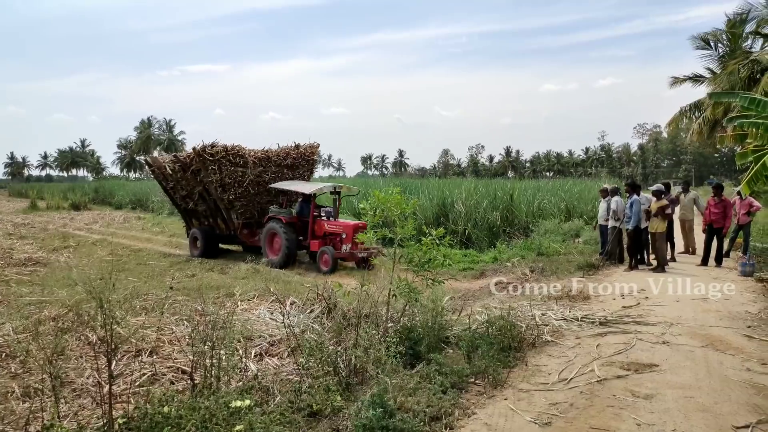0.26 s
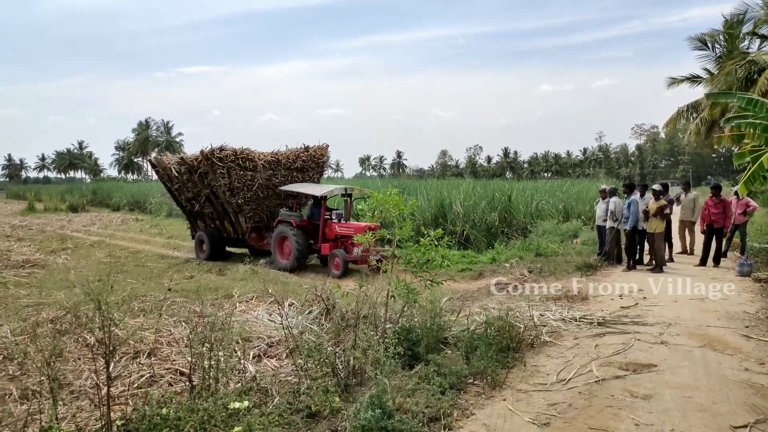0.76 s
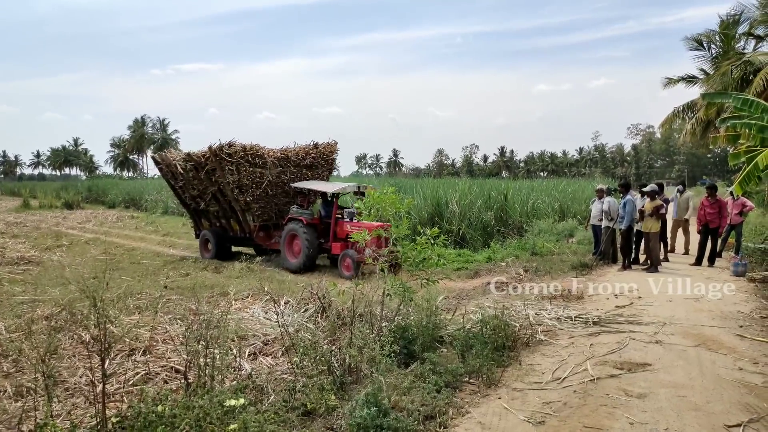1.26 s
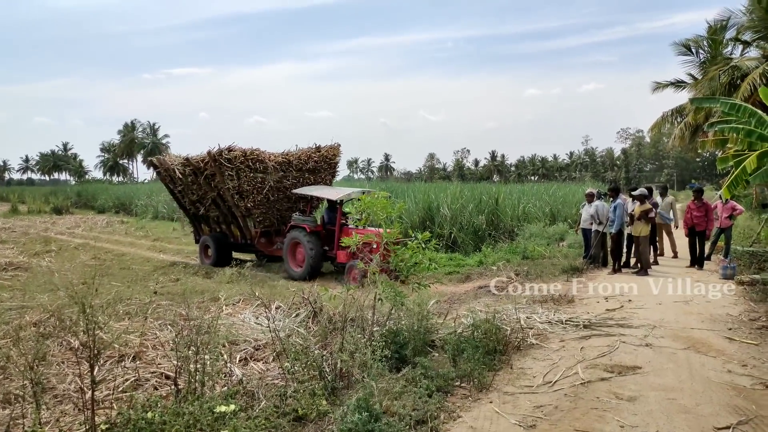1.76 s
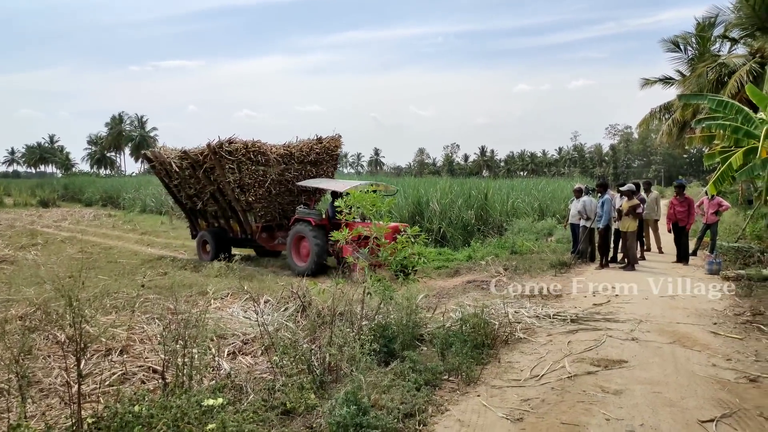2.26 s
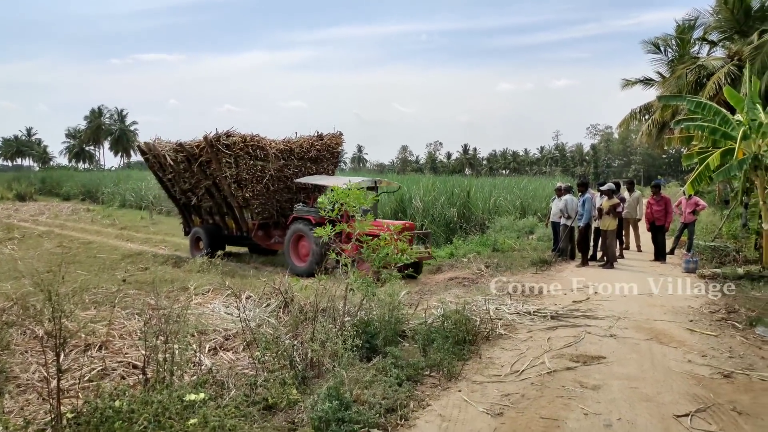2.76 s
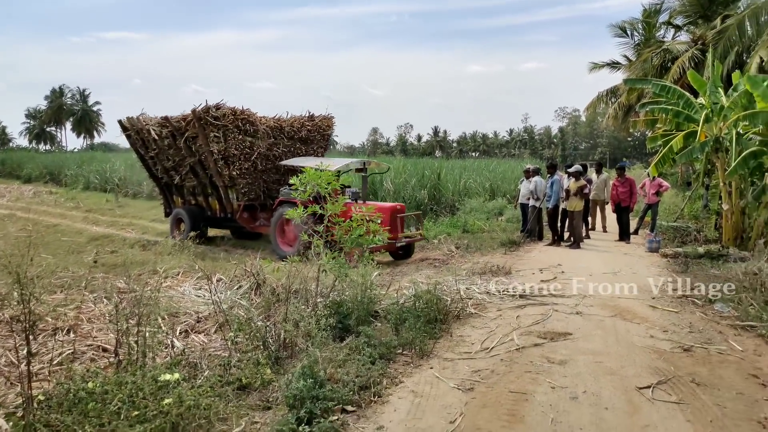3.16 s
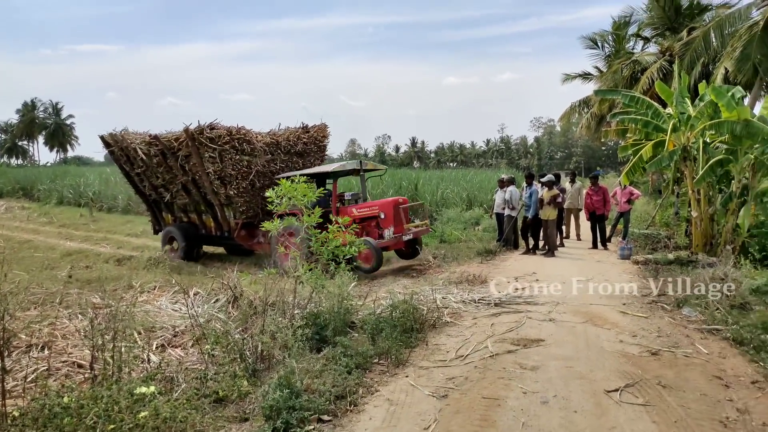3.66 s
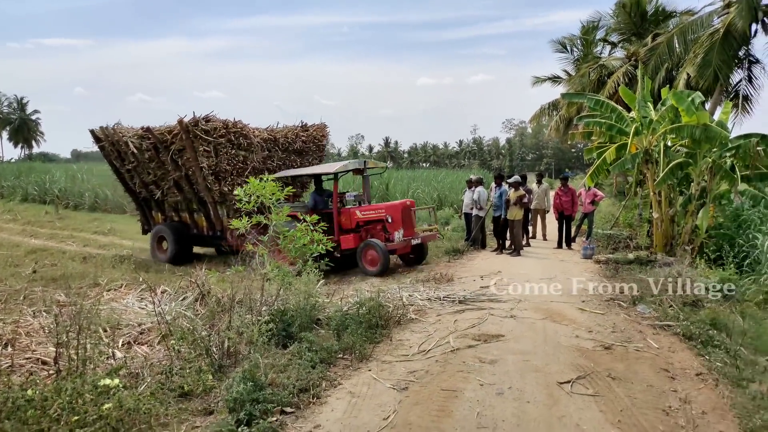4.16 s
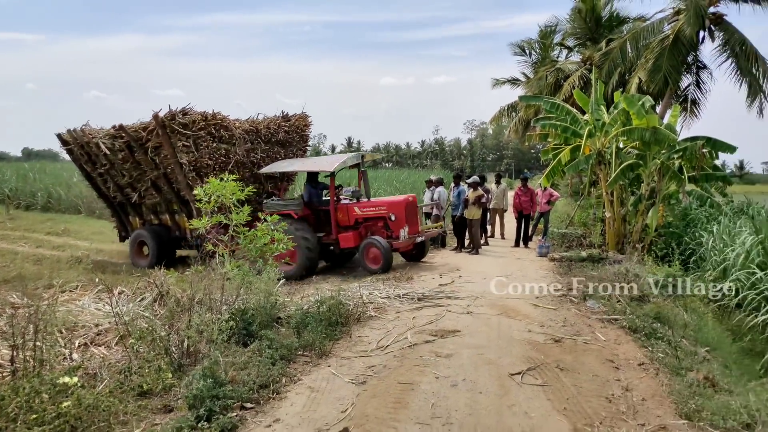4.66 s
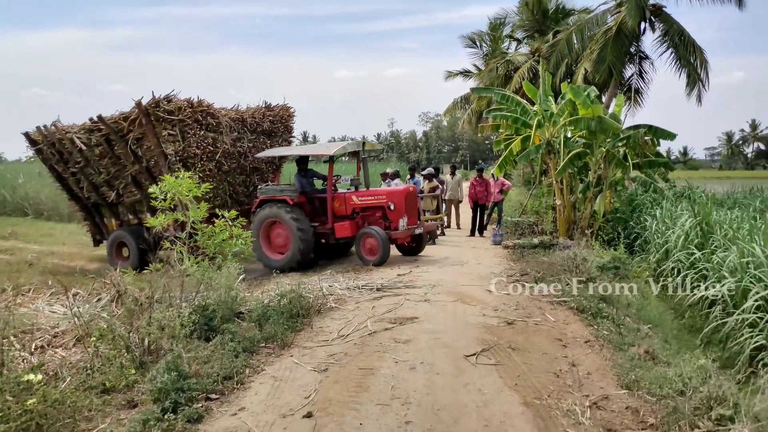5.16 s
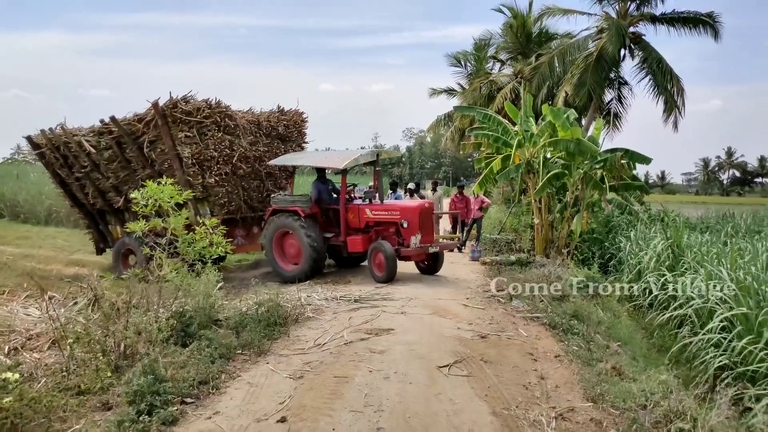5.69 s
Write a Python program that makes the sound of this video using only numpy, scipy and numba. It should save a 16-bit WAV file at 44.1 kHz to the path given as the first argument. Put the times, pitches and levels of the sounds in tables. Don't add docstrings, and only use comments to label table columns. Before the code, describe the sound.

A diesel tractor idles unevenly in an open field, then revs hard and hauls a heavy rattling trailer steadily closer.

```python
import sys
import numpy as np
from scipy import signal
from scipy.fft import rfft, irfft
from scipy.io import wavfile
from scipy.ndimage import uniform_filter1d
from numba import njit

SR = 44100
rng = np.random.default_rng(int(sys.argv[2]) if len(sys.argv) > 2 else 0)


def generate_wav(sig):
    pcm = np.round(np.clip(np.atleast_2d(sig).T, -1, 1) * 32767).astype(np.int16)
    wavfile.write(sys.argv[1], SR, pcm)


def ratio_of_db(decibels):
    return 10 ** (np.asarray(decibels, float) / 20)


N = 261513

# [f/Hz, level/dB]
PIPE_RESPONSE = [(120, -5), (155, -6), (175, -9), (207, -12), (270, -23), (335, -28), (415, -29),
                 (480, -20), (545, -25), (700, -31), (900, -39)]
# [f/Hz, width/Hz, level/dB]
BLOCK_MODES = [(650, 90, 5), (1000, 130, -5), (1450, 260, -8), (2100, 160, -6), (3100, 300, -11)]
CYLINDER_LEVELS = [0, -.6, .3, -.5]
# [f/Hz, level/dB per Hz]
ROAR_SPECTRUM = [(45, -18.5), (100, 4.5), (200, -2), (340, -3), (520, 1), (700, -2), (850, -2), (1100, -5),
                 (1500, -8), (2000, -9.5), (2600, -6.5), (4500, -8), (8000, -5.5)]
# [f/Hz, level/dB]
LEFT_PORT_RESPONSE = [(30, 3), (200, 1.5), (500, 0.5), (900, -6.5), (1400, -19.5), (1900, -23), (2600, -16),
                      (4300, -12), (5500, -6), (6100, 2.5), (6550, 3), (7300, -1), (7750, -12.5),
                      (7950, -54)]
# [f/Hz, level/dB]
RIGHT_PORT_RESPONSE = [(30, 0.5), (200, 0), (500, 1.5), (4500, 1), (5500, 5), (6600, 7.5), (7050, 10),
                       (7420, 15.5), (7750, 6), (7980, -9.5), (8330, -57.5)]
# [f/Hz, share/0-1]
PORT_CORRELATION = [(100, 0.95), (500, 0.98), (1000, 1), (1900, 0), (4000, 0.4), (5500, 0.8), (7500, .45)]
# [t/s, peak level/dB, ring f/Hz, t60/s]
LOOSE_KNOCKS = [(1.218, -46, 5250, .05), (1.264, -43, 5250, .06), (1.268, -46, 5950, .05),
                (1.31, -41, 5900, .07), (1.355, -46, 5800, .05), (2.571, -25, 650, .05),
                (2.5715, -25, 7300, .02), (3.7435, -20, 7400, .015), (1.93, -42, 5900, .07),
                (1.97, -41, 6000, .07), (2.02, -41, 5900, .06), (4.4705, -16, 400, .045),
                (4.4725, -30, 1850, .02), (4.825, -29, 560, .07), (5.0888, -15, 6800, .011),
                (4.6, -31, 430, .1), (4.74, -33, 390, .08), (4.91, -33, 380, .08), (5.09, -30, 420, .1),
                (5.152, -27, 6000, .04), (5.27, -25, 6100, .08), (5.31, -23, 6000, .08),
                (5.35, -24, 6200, .07)]
# [order/1, level/dB re pipe response]
HALF_ORDER_LEVELS = [(1.5, -27), (2.5, -14), (3.5, -13), (4.5, -15), (5.5, -14), (6.5, -12), (7.5, -3),
                     (8.5, -10)]
# [f/Hz, half width/Hz, level/dB]
PANEL_MODES = [(926, 130, -1), (1260, 250, 3.5), (1550, 29, 10), (2003, 180, 7.5), (2314, 92, -4),
               (2477, 15, 6), (2980, 32, 3), (3430, 60, 0), (3800, 42, 1.5), (4530, 60, 3), (5700, 65, -5)]
# [f/Hz, level/dB]
LOAD_GAIN = [(120, -4.5), (220, 6.5), (380, 4), (550, 9.5), (750, 1.5), (1050, 0.5), (1600, 0.5)]
# [t/s, firing f/Hz]
FIRING_RATE = [(0, 42.7), (.42, 44.7), (.8, 42.2), (1.2, 44.1), (1.88, 41.8), (2.03, 43.2), (2.26, 49.2),
               (3.04, 58.8), (3.35, 65.4), (3.68, 65.4), (3.83, 68.1), (4.03, 67.2), (4.33, 69.3),
               (4.62, 69.1), (4.73, 70.8), (5.02, 69.8), (5.17, 67.5), (5.93, 68.8)]
# [t/s, distance/m]
APPROACH = [(0, 20.7), (2.0, 18.8), (3.3, 18.9), (4.2, 16), (5.2, 13.6), (5.93, 10.1)]
# [peak t/s, rise/s, fall/s, level/dB]
FUEL_SURGES = [(.11, 0.17, 0.21, 7), (.41, 0.17, 0.05, 16.5), (.5, .04, 0.069, 2), (.59, 0.058, 0.059, 2),
               (.73, 0.15, 0.03, 12), (.89, 0.18, .05, 6), (1.03, 0.15, 0.052, 10.5), (1.23, .1, 0.14, 7.5),
               (1.36, 0.1, 0.064, 9), (1.6, 0.17, 0.17, 5.5), (1.95, 0.21, 0.24, 13)]
# [deepest t/s, fall/s, recovery/s, level/dB]
FUEL_CUTS = [(2.36, 0.081, .08, -2.5), (2.9, 0.097, 0.19, -3), (3.75, .3, 0.21, -0.5),
             (3.91, 0.11, 0.085, -6), (4.385, 0.14, 0.084, -6), (4.46, .15, 0.14, -8.5),
             (4.6, 0.13, 0.12, -1), (4.69, 0.084, 0.11, -11), (4.78, 0.058, 0.18, -8),
             (4.95, 0.088, 0.15, -11.5), (5.08, 0.075, .11, -8.5), (5.66, 0.097, 0.082, -2.5)]
# [leanest t/s, fall/s, recovery/s, level/dB]
FUEL_BUILD_UP = [
    (2.08, 0.038, 0.67, -1.5),
]
# [t/s, level/dB]
MISFIRES = [
    (.3, -15),
    (.46, 1),
    (.56, -3),
    (.84, -5),
    (1.14, -5),
    (4.385, -13.5),
    (4.77, -3),
    (4.96, -5.5),
]
# [f/Hz, level/dB]
TAILPIPE_RESPONSE = [(44, 1.3), (50, -3), (59, 0.5), (65, 1), (69, -1)]

# [idle level/dB, surge gain/1, open-throttle rise/dB, cut gain/1, slope/(dB per Hz)]
BODY_LAYER = (-45, 0.21, 7, 0.22, -0.04)
CLATTER_LAYER = (-51, 0.2, 7.5, 0.41, 0.2158)
HISS_LAYER = (-51.5, 0.89, 20, 0.79, 0.12)
PUFF_LAYER = (2.5, 0.83, 16, 1.6, -.5)
RASP_LAYER = (1.5, 0.41, -2.5, -.5, 0.1877)
KNOCK_LAYER = (-23, -0.36, 12.5, 0.2, -0.8555)
FIRST_ORDER_LAYER = (-44.5, 1.0, 21.5, 0.95, -0.04)
SECOND_ORDER_LAYER = (-39.5, 0.57, 12, 1.25, 0.2332)
UPPER_ORDERS_LAYER = (-41.5, 0.8255, 17.5, 1.7, 0)

SILENCER_HZ, SILENCER_HALF_WIDTH_HZ = 43.5, 4.3
GROUND_ECHO_S = .00245
THROTTLE_OPENS_S, THROTTLE_TAKES_S, IDLE_HZ = 2.046, 0.063, 47
LOOSE_RAD_PER_DB = 0.19
MISS_S = 0.045


def column_over_time(table):
    seconds, values = np.transpose(table)
    return np.interp(np.arange(N) / SR, seconds, values)


def on_log(hz, table):
    f, v = np.transpose(table)
    return np.interp(np.log(np.maximum(hz, 1)), np.log(f), v)


def bumps(table):
    t = np.arange(N) / SR
    total = 0
    for peak_s, rise_s, fall_s, db in table:
        away = np.where(t < peak_s, (peak_s - t) / rise_s, (t - peak_s) / fall_s)
        total = total + db * np.cos(np.pi / 2 * np.clip(away, 0, 1)) ** 2
    return total


def drift(rate):
    k = int(SR / rate)
    held = np.repeat(rng.standard_normal(N // k + 1), k)
    return 1.03 * uniform_filter1d(uniform_filter1d(held, k), k)[:N]


def even(x, span_s):
    k = int(span_s * SR)
    power = uniform_filter1d(uniform_filter1d(x ** 2, k), k)
    return x / np.sqrt(power + 1e-18)


@njit
def svf(x, hz, width):
    y, band, low = np.empty(len(x)), 0., 0.
    for i in range(len(x)):
        g, k = np.tan(np.pi * hz[i] / SR), width[i] / hz[i]
        v = (band + g * (x[i] - low)) / (1 + g * (g + k))
        band, low, y[i] = 2 * v - band, low + 2 * g * v, k * v
    return y


def modes(x, table):
    return sum(ratio_of_db(db) * svf(x, np.full(N, 1. * hz), np.full(N, 1. * w)) for hz, w, db in table)


def answers(hz):
    throttle = np.clip((np.arange(N) / SR - THROTTLE_OPENS_S) / THROTTLE_TAKES_S, 0, 1)
    surge_db = bumps(FUEL_SURGES) * (1 - throttle)
    cut_db = bumps(FUEL_CUTS + FUEL_BUILD_UP)
    over_idle_hz = np.maximum(hz - IDLE_HZ, 0)

    def answer(idle_db, surge, open_db, cut, slope):
        return idle_db + surge * surge_db + open_db * throttle + cut * cut_db + slope * over_idle_hz

    return answer


def firings(hz, wobble, scatter_db):
    chance = rng.standard_normal(500)
    turns = np.cumsum(hz) / SR + wobble * drift(25) + .45
    number = np.clip(turns.astype(int), 0, 499)
    sizes = ratio_of_db(scatter_db * chance + np.resize(CYLINDER_LEVELS, len(chance)))
    return turns, number, sizes[number]


def loose_parts():
    out, t = np.zeros(N + SR), np.arange(SR // 10) / SR
    for s, db, hz, t60 in LOOSE_KNOCKS:
        i = int(s * SR)
        ring = np.sin(2 * np.pi * hz * t) * np.exp(-np.log(1000) * t / t60)
        out[i:i + len(t)] += ratio_of_db(db) * np.minimum(t / t60 * 30, 1) * ring
    return out[:N]


def rattle(phase, db):
    starts = np.flatnonzero(np.diff(phase) < -.5)
    chance = rng.random((500, 2, 3))
    out, t = np.zeros(N + SR), np.arange(SR // 20) / SR
    for i, panels in zip(starts, chance):
        for pitch, late, size in panels:
            j = i + int(late * .004 * SR)
            ring = np.sin(2 * np.pi * 900 * 7 ** pitch * t) * np.exp(-np.log(1000) * t / .07)
            out[j:j + len(t)] += ratio_of_db(db[i] - 12 * size) * np.minimum(t / .001, 1) * ring
    return out[:N]


def machine_noise(phase, number, size, load, body_db, clatter_db, hiss_db, depth_db):
    f = np.arange(N // 2 + 1) * SR / N
    panels_db = sum(db / (1 + ((f - hz) / w) ** 2) for hz, w, db in PANEL_MODES)
    colour = ratio_of_db(on_log(f, ROAR_SPECTRUM) + panels_db)
    echo = .55 / (1 + (f / 2200) ** 2) * np.exp(-2j * np.pi * f * GROUND_ECHO_S)
    colour = colour * abs(1 - echo)
    out, step = np.zeros((2, N)), 1 / 3
    for hz in 50 * 2 ** np.arange(0, 7.5, step):
        octaves = np.log2(np.maximum(f, 1) / hz)
        shape = np.cos(np.pi / 2 * np.clip(octaves / step, -1, 1)) * colour
        a, b = irfft(rfft(rng.standard_normal((2, N))) * shape, N)
        own_db = .9 * rng.standard_normal(500)[number]
        high = np.clip(np.log2(hz / 600) / 2.1, 0, 1)
        lag = (phase + .05 + 0.079 * high) % 1
        puff = np.minimum(lag / 0.18, 1) * np.exp(-lag / (0.34 + 0.2 * high))
        puff_db = np.clip(hz / 400, 0, 1) * np.clip(depth_db, 3, 22) * 1.296 * (puff - .35)
        gate = uniform_filter1d(ratio_of_db(puff_db + own_db) * size, int(SR * .002))
        mid = np.clip(np.log2(hz / 900) / 0.83, 0, 1)
        top = np.clip(np.log2(hz / 3200) / 1.82, 0, 1)
        below_db = (1 - mid) * (body_db + 18.0) + mid * (clatter_db + 18.5)
        db = (1 - top) * below_db + top * (hiss_db + 10.0)
        db = db + (load - 1) * on_log(hz, LOAD_GAIN)
        alike = np.clip(on_log(hz, PORT_CORRELATION), 0, 1)
        out += ratio_of_db(db) * gate * np.array([alike * a + np.sqrt(1 - alike ** 2) * b, a])
    return out


def knock(hz, phase, size, db):
    edge = size ** 2.2 * np.sin(np.pi * np.clip(phase / hz / .0003, 0, 1)) ** 2
    return ratio_of_db(db) * even(modes(edge - edge.mean(), BLOCK_MODES), 0.13)


def exhaust(hz, turns, size, first_db, second_db, upper_db, rasp_db, loose):
    angle = 2 * np.pi * (turns - .12)
    ahead = np.arctan2(SILENCER_HALF_WIDTH_HZ, hz - SILENCER_HZ)
    out = ratio_of_db(first_db) * np.cos(angle + ahead)
    out += ratio_of_db(second_db) * np.cos(2 * angle + loose * drift(12))
    for k, db in [(k, 0) for k in range(3, 14)] + HALF_ORDER_LEVELS:
        colour_db = on_log(k * hz, PIPE_RESPONSE) + rasp_db * np.clip((k * hz - 230) / 40, 0, 1)
        colour_db -= 11 * np.clip((48 - hz) / 3, 0, 1) * np.clip((k * hz - 185) / 20, 0, 1)
        shaky = min(k / 10, 1)
        late = 1.5 * (k > 3) + .06 * max(k - 5, 0) ** 2 + (.35 * shaky + loose) * drift(14)
        order_db = upper_db + db + colour_db + 3 * shaky * drift(12)
        out += ratio_of_db(order_db) * np.cos(k * angle + late)
    return -np.sqrt(2) * out * uniform_filter1d(size, int(SR * .01))


def scene():
    hz, metres = column_over_time(FIRING_RATE), column_over_time(APPROACH)
    answer, near_db = answers(hz), 20 * np.log10(20 / metres)
    turns, number, size = firings(hz, wobble=.006, scatter_db=.55)
    phase = turns % 1
    load = np.clip((hz - IDLE_HZ) / 15, 0, 1)

    gas_layers = (BODY_LAYER, CLATTER_LAYER, HISS_LAYER)
    gas_db = [answer(*layer) + near_db + 0.55 * drift(16) for layer in gas_layers]
    noise = machine_noise(phase, number, size, load, *gas_db, answer(*PUFF_LAYER))

    first_db = answer(*FIRST_ORDER_LAYER) + near_db + on_log(hz, TAILPIPE_RESPONSE)
    first_db = first_db + bumps([(s, MISS_S, MISS_S, db) for s, db in MISFIRES])
    second_db = answer(*SECOND_ORDER_LAYER) + near_db
    upper_db = answer(*UPPER_ORDERS_LAYER) + near_db
    loose = -LOOSE_RAD_PER_DB * bumps(FUEL_CUTS)
    engine = exhaust(hz, turns, size, first_db, second_db, upper_db, answer(*RASP_LAYER), loose)
    engine += knock(hz, phase, size, second_db + answer(*KNOCK_LAYER))
    engine += rattle(phase, gas_db[1] + 5.0)
    return loose_parts() + noise + engine


def port(x, table):
    size = 4096
    c = irfft(np.log(ratio_of_db(on_log(np.arange(size // 2 + 1) * SR / size, table))))
    c[1:size // 2] *= 2
    c[size // 2 + 1:] = 0
    return signal.fftconvolve(x, irfft(np.exp(rfft(c))))[:N]


def starved(x, lo_hz, hi_hz, under_db):
    f, _, z = signal.stft(x, SR, nperseg=2048)
    power = uniform_filter1d(abs(z) ** 2, size=6, axis=0)
    power = power[3::6].repeat(6, axis=0)[:len(f) - 5]
    power = uniform_filter1d(power, size=2, axis=1)
    dips = power < ratio_of_db(2 * under_db) * uniform_filter1d(power, size=36, axis=0)
    in_range = ((f > lo_hz) & (f < hi_hz))[:len(dips), None]
    z[:len(dips)][dips & in_range] = 0
    return signal.istft(z, SR, nperseg=2048)[1][:N]


def roll_off(x):
    return signal.sosfilt(signal.butter(12, 8300, fs=SR, output="sos"), x)


def record(dry):
    left = port(np.roll(dry[0], shift=3), LEFT_PORT_RESPONSE)
    left = starved(left, 1400, 5000, under_db=-2.7)
    right = port(dry[1], RIGHT_PORT_RESPONSE)
    bass_cut = signal.butter(3, 33, "high", fs=SR, output="sos")
    x = signal.sosfiltfilt(bass_cut, np.array([left, right]), padtype="even")
    return roll_off(1.04 * np.tanh(.9 * x) / .9)


dry = scene()
out = record(dry)
generate_wav(out)
```